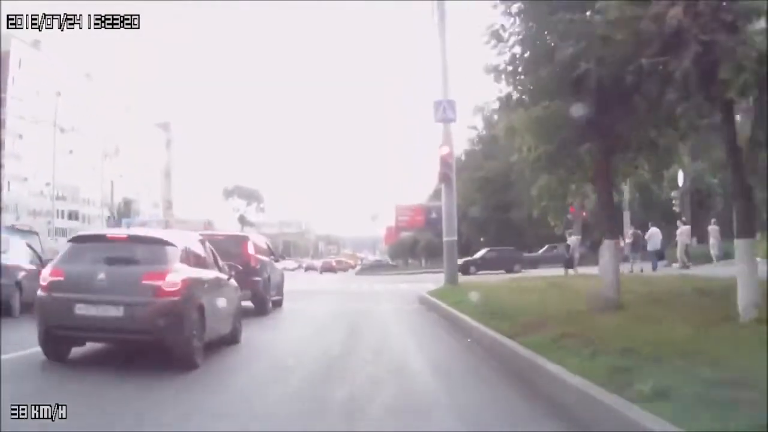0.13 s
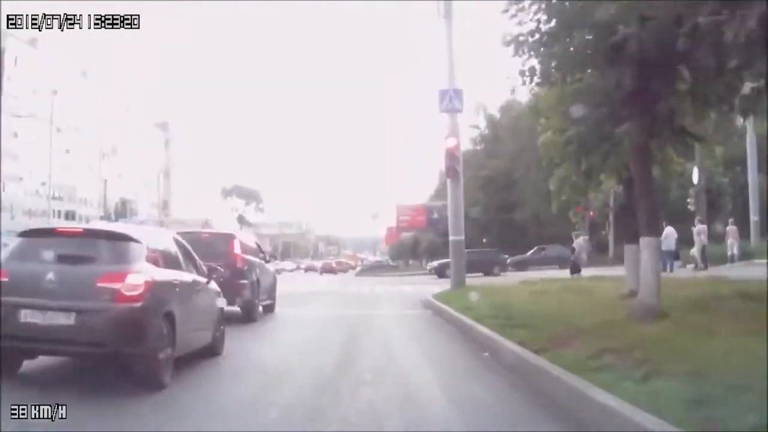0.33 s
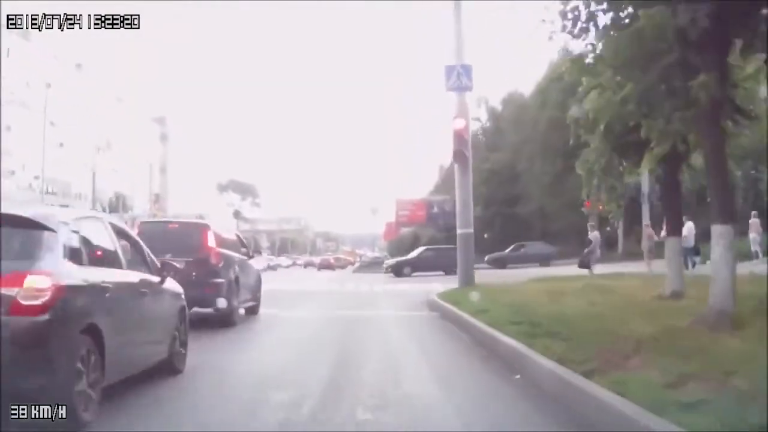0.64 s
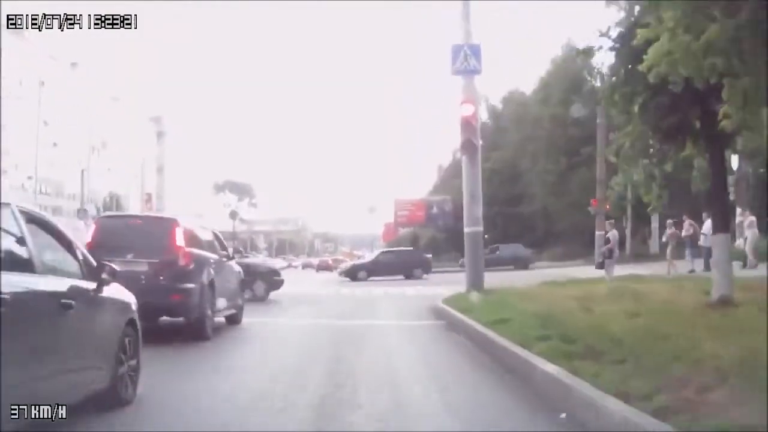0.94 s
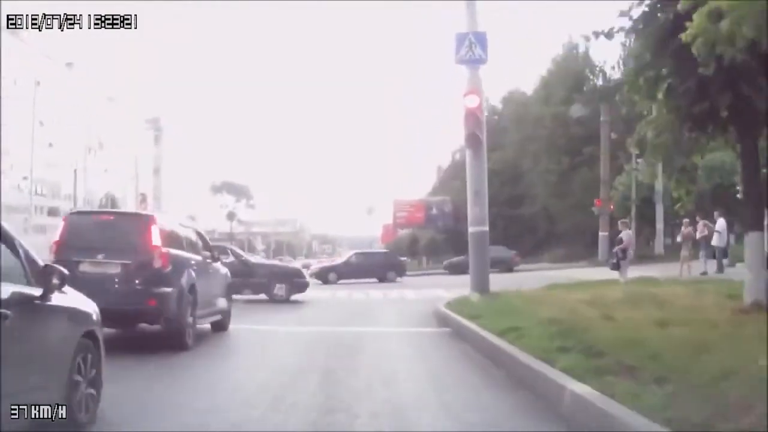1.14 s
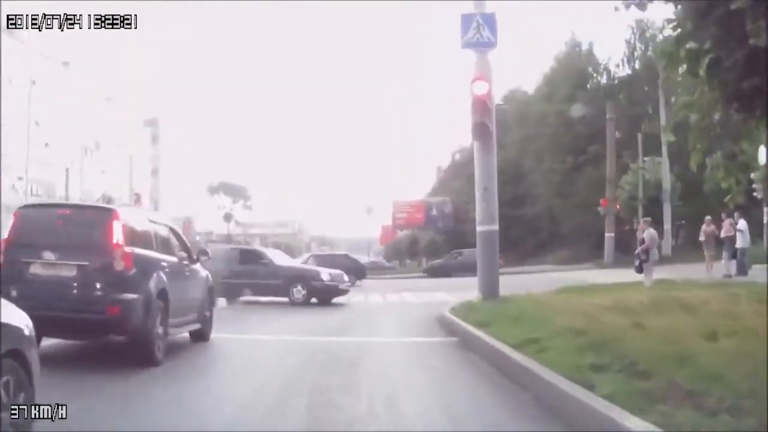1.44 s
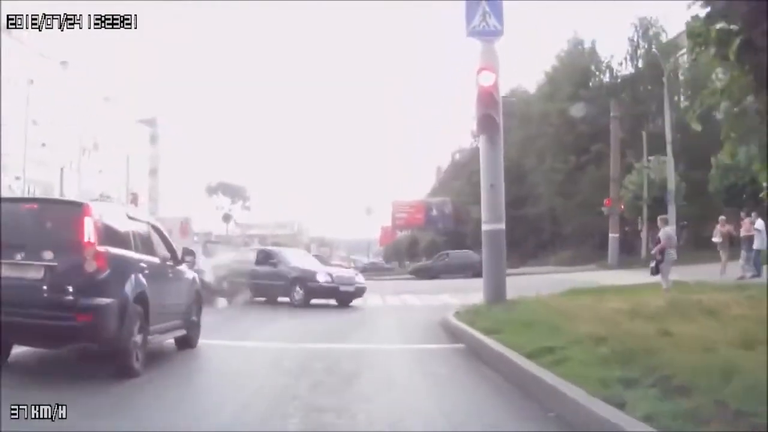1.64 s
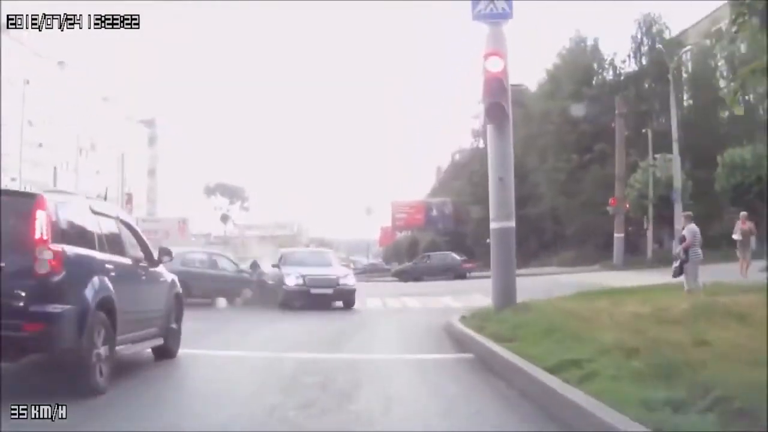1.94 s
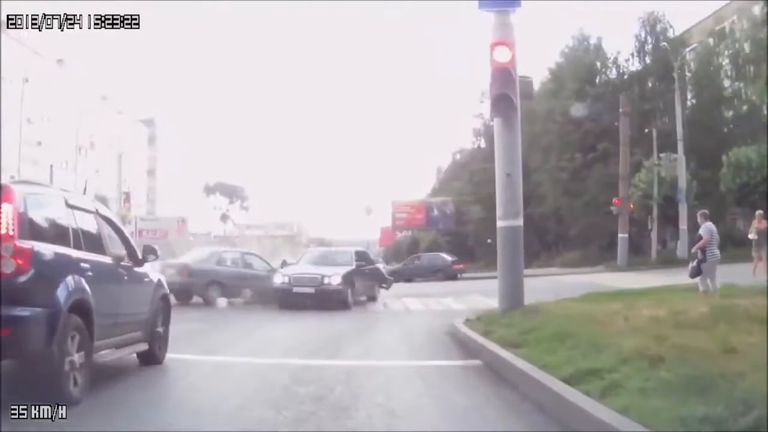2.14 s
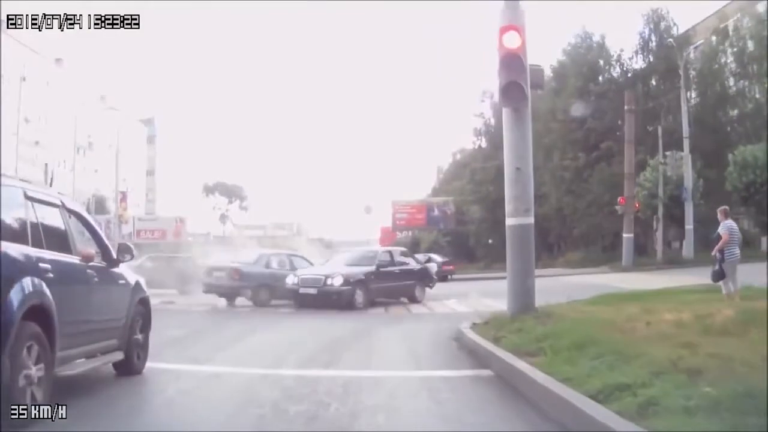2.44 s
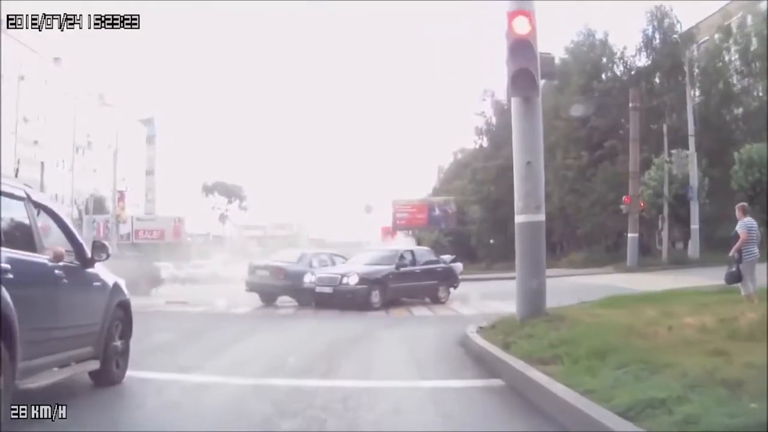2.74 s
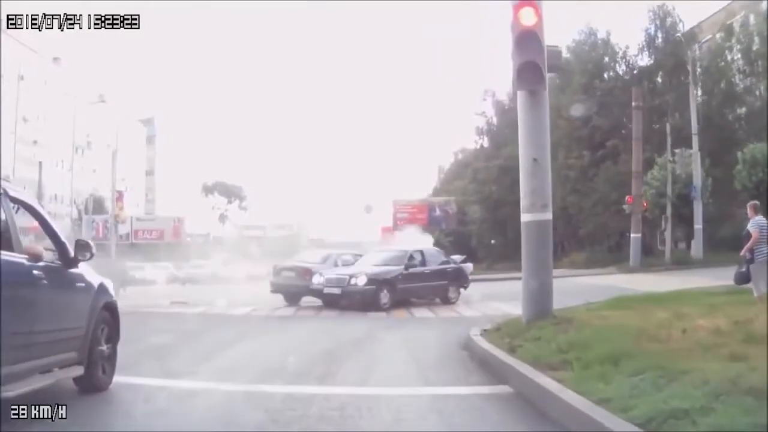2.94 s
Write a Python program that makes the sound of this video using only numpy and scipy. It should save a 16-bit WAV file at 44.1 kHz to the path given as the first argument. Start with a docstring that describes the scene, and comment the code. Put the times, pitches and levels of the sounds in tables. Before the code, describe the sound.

Two cars collide with a hard metallic crunch, then tyres squeal on, heard inside another car

```python
"""Two cars collide at a junction, heard from inside another car whose road noise and hum last throughout.
Locked tyres howl first, as wavering tones; at about 0.31 s bursts of noise and ringing panel tones crunch.
A hissing shower of glass follows, then gliding squeals and scrubbing noise as the cars spin on the asphalt.
Loose plastic rattles at the blow and twice near the end; house fronts echo and the cabin colours everything."""
import sys
import numpy as np
from scipy import signal
from scipy.fft import rfft, irfft, next_fast_len
from scipy.io import wavfile
from scipy.ndimage import map_coordinates

SR = 44100
rng = np.random.default_rng(int(sys.argv[2]) if len(sys.argv) > 2 else 0)


def wav_record(signal):
    """Record a signal, one row per channel, as 16-bit PCM in the file named by sys.argv[1]."""
    frames = np.transpose(np.atleast_2d(signal))
    bounded = np.clip(frames, -1, 1)
    # unit amplitude maps onto the largest positive 16-bit level
    quanta = np.round(bounded * 32767).astype(np.int16)
    wavfile.write(sys.argv[1], SR, quanta)


N = 136710
T = np.arange(N) / SR  # time of each sample in seconds


def amp(db):
    """Turn decibels into a plain multiplier."""
    return 10 ** (np.asarray(db) / 20)


def unit(x):
    """Scale a sound to an average strength (rms) of 1."""
    return x / np.sqrt(np.mean(x ** 2) + 1e-20)


def curve(rows):
    """Join (seconds, value) points with straight lines, giving one value per sample."""
    return np.interp(T, *np.transpose(rows))


def wobble(rate):
    """A smooth random curve through `rate` random points a second."""
    points = rng.standard_normal(8192)
    return map_coordinates(points, [T * rate], mode="wrap")


def filtered(x, response):
    """Multiply each frequency in x by response(frequency in Hz)."""
    size = next_fast_len(N + SR // 2)  # silence added at the end keeps the filter from wrapping round
    frequencies = np.fft.rfftfreq(size, 1 / SR)
    return irfft(rfft(x, size) * response(frequencies), size)[:N]


def noise(spectrum, grain_db=0):
    """Noise of rms 1, coloured by (Hz, dB) points; grain_db roughens its strength over milliseconds."""
    hz, db = np.transpose(spectrum)
    grain_level = grain_db * np.tanh(wobble(700) / 2) * 2
    grains = rng.standard_normal(N) * amp(grain_level)

    def colour(f):
        return amp(np.interp(np.log(f + 1), np.log(hz + 1), db))

    return unit(filtered(grains, colour))


def strike(start, attack, t60):
    """A blow's loudness: a straight rise, then a decay of 60 dB in t60 seconds."""
    rise = np.clip((T - start) / attack, 0, 1)
    decay_db = -60 * np.maximum(T - start - attack, 0) / t60
    return rise * amp(decay_db)


def own_car():
    """Road noise is coloured noise and the engine a low sine; add faint hiss and short plastic clacks."""
    # Road noise in the cabin. Each row: frequency in Hz, relative level in dB.
    road_colour = [(20, -22.5), (35, -9), (52, -1), (90, -6), (200, -6.5), (420, 0.5), (700, -5),
                   (1100, 5.5), (2000, -21), (4000, -28.5), (7000, -42), (10000, -54), (15000, -55)]
    # Loudness of the road. Each row: time in seconds, level in dB.
    road_level = [(0, -31.5), (.75, -29.5), (1.5, -33.5), (2.5, -37), (3.1, -37.5)]
    # The microphone's own hiss. Each row: frequency in Hz, relative level in dB.
    hiss_colour = [(2000, -1.5), (5000, 2.5), (7000, -2.5), (10000, -7), (15000, -4)]
    # Rattles of loose plastic. Each row: start in seconds, level in dB, time to fall 60 dB in seconds,
    # level of the bright tick in dB relative to that of the rattle.
    rattles = [(.318, -33, 0.42, -2.5), (2.237, -39, 0.11, -6), (2.944, -29.5, 0.089, 0.5)]
    # The plastic's clack. Each row: frequency in Hz, relative level in dB.
    clack_colour = [(300, -15), (1500, 10.5), (3500, 0), (6000, -8.5), (8000, -13.5), (15000, -24)]
    # The plastic's bright tick. Each row: frequency in Hz, relative level in dB.
    tick_colour = [(3000, -40), (8000, -16), (10000, -20.5), (12500, -1), (15000, -4.5)]
    engine_hz, engine_db, hiss_db = 49.9, -54, -58.5

    clack = noise(clack_colour)
    tick = noise(tick_colour, grain_db=1)
    rattle = np.zeros(N)
    for start, db, t60, tick_db in rattles:
        rattle += amp(db) * strike(start, 0.0043, t60) * (amp(-0.5) * clack + amp(tick_db) * tick)
    engine_level = amp(engine_db + 2.6 * wobble(6.3))
    engine = engine_level * np.sin(2 * np.pi * engine_hz * T + wobble(6))
    road = amp(curve(road_level) + 1.3 * wobble(7.64)) * noise(road_colour)
    return road + engine + amp(hiss_db) * noise(hiss_colour) + rattle


def street(x):
    """House fronts return a short, dull, diffuse echo: the sound is smeared by a fading burst of noise."""
    t60, echo_db, dull_hz = 0.54, -16, 5000  # seconds to fall 60 dB, level, where the treble drops
    tail = filtered(rng.standard_normal(N), lambda f: 1 / (1 + (f / dull_hz) ** 4))
    tail *= strike(.012, 0.012, t60)
    echo = signal.fftconvolve(x, tail / np.linalg.norm(tail))[:N]
    return x + amp(echo_db) * echo


def stick_slip(hz, octave_db, jitter, jitter_rate, flutter_db):
    """A tread gripping and slipping vibrates by itself: three partials, unsteady in pitch and strength."""
    unsteady_hz = hz * (1 + jitter * wobble(jitter_rate))
    phase = 2 * np.pi * np.cumsum(unsteady_hz) / SR
    levels = [0, octave_db, octave_db - 22.5]  # dB of the base note, its octave and its third partial
    partials = np.zeros(N)
    for k, db in enumerate(levels, 1):
        partials += amp(db + 3.1 * wobble(60)) * np.sin(k * phase)
    flutter = unit(amp(flutter_db * np.tanh(wobble(110))))
    return partials * np.sqrt(2) * flutter


def skid():
    """Sliding tyres howl as rough tones; noise scrubs over the grit and screeches as the cars swing round."""
    # Loudness of the howl. Each row: time in seconds, level in dB (the whole is shifted below).
    howl_level = [(0, -36), (.28, -28.5), (.48, -20), (.6, -21), (.8, -22), (.905, -25), (.96, -24.5),
                  (1.07, -24), (1.23, -20.5), (1.29, -24.5), (1.42, -22), (1.56, -22), (1.58, -25),
                  (1.76, -22.5), (1.83, -29.5), (2.1, -28.5), (2.18, -33.5), (2.47, -24.5), (2.78, -24.5),
                  (2.91, -43), (3.1, -34)]
    # Pitch of the howl. Each row: time in seconds, frequency in Hz.
    howl_pitch = [(0, 961.3), (.55, 944.4), (.8, 877.7), (1.0, 921), (1.25, 922.5), (1.5, 856.6),
                  (1.75, 879), (2.05, 935), (2.4, 883.6), (2.75, 939.4), (3.1, 938)]
    # Howling tyres. Each row: pitch as a multiple of the howl's, level in dB, level of the octave in dB.
    tyres = [(1, -2, -13), (1.19, -7, -13)]
    # Rubber tearing over grit. Each row: time in seconds, level in dB (the whole is shifted below).
    scrub_level = [(0, -65), (.28, -52), (.4, -41), (.8, -41.5), (1.25, -51.5), (1.45, -42.5), (1.72, -49),
                   (1.87, -43.5), (2.06, -41), (2.17, -48), (2.29, -43), (2.5, -45.5), (2.7, -53),
                   (3.1, -53)]
    # Colour of the scrubbing. Each row: frequency in Hz, relative level in dB.
    grit_colour = [(290, -61), (500, -16.5), (646, -17.5), (883, -5), (1000, -21), (1090, -2.5),
                   (1350, -12), (1830, -4.5), (2430, -15), (5860, -37.5), (8990, -49), (15000, -41.5)]
    # Loudness of the high screech. Each row: time in seconds, level in dB.
    screech_level = [(1.8, -64.5), (1.92, -49.5), (2.05, -37.5), (2.17, -53), (2.28, -39.5), (2.38, -49),
                     (2.47, -41.5), (2.6, -55.5), (2.9, -50.5)]
    # Colour of the screech. Each row: frequency in Hz, relative level in dB.
    screech_colour = [(1500, -36.5), (2200, -10), (2600, 2), (3200, 0.5), (3700, -11.5), (6000, -32.5),
                      (12000, -58)]

    howl = np.zeros(N)
    for ratio, db, octave_db in tyres:
        voices = np.zeros(N)
        for _ in range(3):  # three voices that waver separately
            hz = curve(howl_pitch) * ratio * (1 + .035 * wobble(20))
            voices += stick_slip(hz, octave_db, jitter=.055, jitter_rate=300, flutter_db=2.0)
        howl += amp(db) * unit(voices)
    scrub = amp(curve(scrub_level) + 11.5) * noise([(100, -32.5)] + list(grit_colour))
    screech = amp(curve(screech_level) + 1.2 * wobble(30)) * noise(screech_colour, grain_db=-2.5)
    return amp(curve(howl_level) - 0.5) * howl + scrub + screech


def squeals():
    """Now and then one tyre, gripping and slipping, locks into a clear, gliding note."""
    # Squeals. Each row: start in seconds, length in seconds, first pitch in Hz, last pitch in Hz,
    # level in dB, level of the octave in dB relative to the base note.
    notes = [(0.541, 0.089, 1125, 1080, -22, -17), (0.602, .1, 930.5, 886, -20.5, -19),
             (.75, 0.13, 895, 865, -22, -20), (0.914, 0.069, 1085, 1084, -17.5, -11),
             (0.976, 0.076, 1144, 1230, -30, -14), (1.128, 0.033, 1079, 1094, -23.5, -5),
             (1.196, 0.061, 1080, 1122, -23, -7.5), (1.372, 0.2035, 909.3, 835, -24.5, -13),
             (1.585, .078, 912, 936, -22, -8), (1.675, 0.043, 915, 914, -17, -12),
             (1.694, 0.081, 935, 930, -17, -9), (1.798, 0.091, 1504, 1450, -33.5, -17.5),
             (1.929, 0.12, 1061, 1140, -39, 2.5), (2.047, 0.11, 1110, 1085, -33.5, -14),
             (2.548, 0.16, 1069, 1113, -29, -12), (2.741, 0.14, 1074, 1204, -28, -9.5),
             (2.897, 0.064, 1390, 1491, -35, -30)]
    edge_s = 0.017  # fade at each end
    out = np.zeros(N)
    for start, length, first_hz, last_hz, db, octave_db in notes:
        end = start + length
        gate = np.clip(np.minimum(T - start, end - T) / edge_s, 0, 1)
        glide_hz = np.interp(T, [start, end], [first_hz, last_hz])
        note = stick_slip(glide_hz, octave_db, jitter=.018, jitter_rate=220, flutter_db=3.5)
        out += amp(db) * gate * note
    return out


def glass():
    """Splinters make a bright, grainy noise that swells, holds and thins out."""
    # Colour of the glass. Each row: frequency in Hz, relative level in dB.
    glass_colour = [(1500, -26), (3500, -12.5), (5000, -6.5), (6500, -3.5), (8000, -9.5), (11000, -16.5),
                    (15000, -7.5)]
    start, rise, hold = 0.35, .07, .17  # seconds; the hold counts from the start and includes the rise
    level_db, fall_db_per_s = -36.5, 83
    swell = np.clip((T - start) / rise, 0, 1)
    fall_db = -fall_db_per_s * np.maximum(T - start - hold, 0)
    return swell * amp(level_db + fall_db) * noise(glass_colour, grain_db=1)


def collision():
    """Each blow crunches metal, booms in the body and rings panels as fading tones; buckling runs between."""
    # Blows between the cars. Each row: start in seconds, level in dB, attack in seconds,
    # time to fall 60 dB in seconds, level of the body's boom in dB relative to the crunch.
    blows = [(.313, -14, 0.012, 0.11, -1.5), (.333, -12.5, 0.0064, 0.17, -10),
             (.378, -27, 0.0026, 0.22, -4), (.391, -20, 0.0021, 0.12, -2.5), (.52, -23, 0.022, 0.12, -6),
             (.555, -19, 0.0026, 0.12, -2), (.586, -23, .004, 0.19, -4.5), (0.639, -24, .004, 0.19, -13.5)]
    # Crumpling sheet metal. Each row: frequency in Hz, relative level in dB.
    metal_colour = [(350, -33), (600, -11.5), (734, -13.5), (1060, 4), (1300, -11.5), (1630, -10),
                    (1950, -5), (2400, -14), (4900, -22), (7060, -31.5), (9000, -50), (15000, -51.5)]
    # Boom of the car body. Each row: frequency in Hz, relative level in dB.
    boom_colour = [(30, -26), (80, -25), (125, -3), (155, -14), (195, -3), (260, -4), (340, -5), (560, 3),
                   (700, -13), (1000, -24), (3000, -60.5)]
    # Ringing panels. Each row: frequency in Hz, relative level in dB, time to fall 60 dB in seconds.
    panels = [(186.5, -9, 0.08), (333, -13, 0.078), (455, -7.5, 0.18), (563.7, -5.5, 0.068),
              (679, -12, 0.32), (1055, -1, 0.19), (1481, -14, 0.18), (1899, -6.5, 0.32), (1920, -27, .2),
              (2844, -16, 0.27)]
    # Loudness of the buckling metal. Each row: time in seconds, level in dB.
    buckle_level = [(.31, -72), (.335, -26), (.46, -22.5), (.58, -26.5), (.7, -31.5), (1.0, -35),
                    (1.4, -41.5), (3.1, -64)]
    # Colour of the buckling. Each row: frequency in Hz, relative level in dB.
    buckle_colour = [(100, -28.5), (300, -10), (600, -8.5), (1050, -3.5), (1300, -8), (1650, 2),
                     (1950, -5.5), (2400, -15), (4900, -24.5), (7000, -38), (10000, -60.5), (15000, -58.5)]

    out = amp(curve(buckle_level)) * noise(buckle_colour, grain_db=4)
    for start, db, attack, t60, boom_db in blows:
        crunch = noise(metal_colour, grain_db=-1.5) + amp(boom_db) * noise(boom_colour)
        ring = np.zeros(N)
        for hz, panel_db, panel_t60 in panels:
            tone = np.sin(2 * np.pi * hz * (T - start) + 0.39 * wobble(59.96))
            ring += amp(panel_db) * strike(start, attack, panel_t60) * tone
        out += amp(db) * (crunch * strike(start, attack, t60) + amp(-3) * ring)
    return out


def scene():
    """The crash and the tyres sound in the echoing street; the listener's own car is added without echo."""
    outside = collision() + glass() + skid() + squeals()
    return (street(outside) + own_car())[None]


def record(dry):
    """Cabin resonances lift or cut narrow bands; the microphone has a notch and nothing passes 15500 Hz."""
    # Cabin resonances. Each row: frequency in Hz, width in Hz, boost or cut in dB.
    resonances = [(157, 35, -4.5), (178, 62, 6.5), (335, 48, 3.5), (470, 30, 3.5), (500, 30, -1),
                  (572, 35, 10), (673, 41, 5.5), (799, 50, 2.5), (985, 59, -4), (1111, 32, 5),
                  (1280, 60, 1.5), (1331, 51, 1.5), (1442, 27, 5), (1559, 19, 7.5), (1712, 21, 4),
                  (1850, 88, 4.5), (2036, 81, 6), (2640, 19, -0.5), (2860, 29, 1.5), (2950, 100, -2),
                  (3440, 100, -7), (4800, 57, 9), (4910, 130, 4), (5950, 280, 5.5)]
    notch_hz, notch_width_hz, top_hz = 9060, 1320, 15500

    def response(f):
        cabin_db = sum(db / (1 + (2 * (f - hz) / width) ** 2) for hz, width, db in resonances)
        notch = 1 - 0.85 * np.exp(-((f - notch_hz) / notch_width_hz) ** 2)
        return amp(cabin_db) * notch * (f < top_hz)

    return filtered(dry[0], response)[None]


dry = scene()
out = record(dry)
wav_record(out)
```